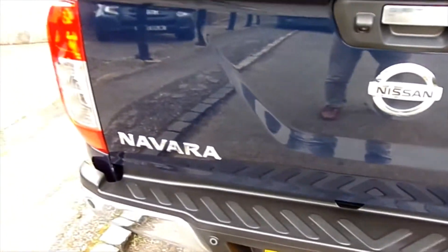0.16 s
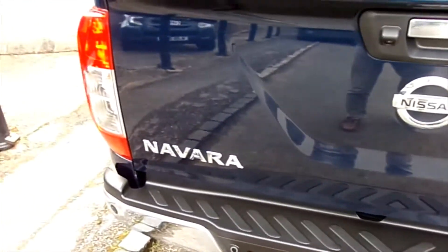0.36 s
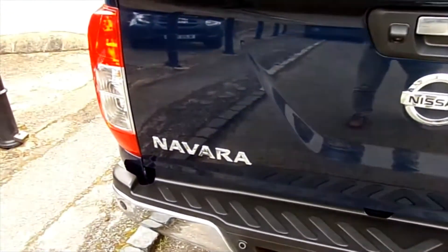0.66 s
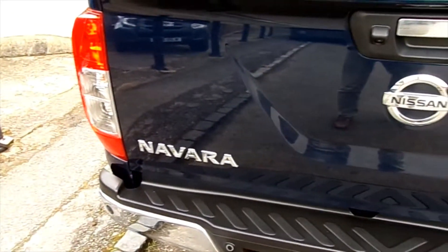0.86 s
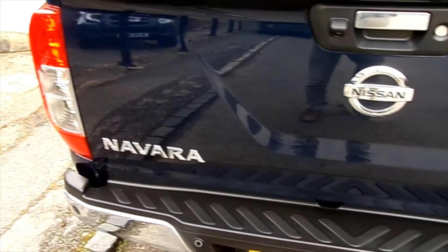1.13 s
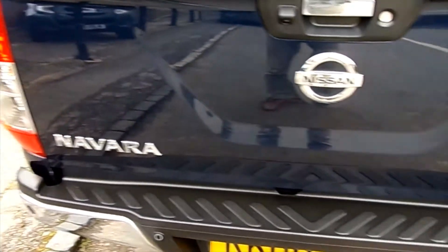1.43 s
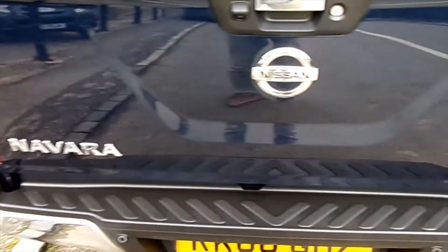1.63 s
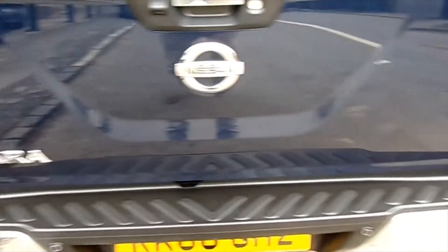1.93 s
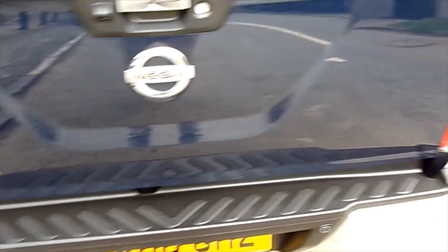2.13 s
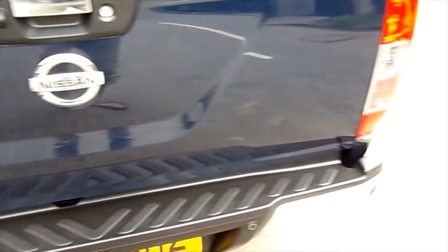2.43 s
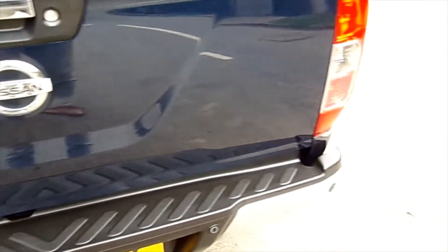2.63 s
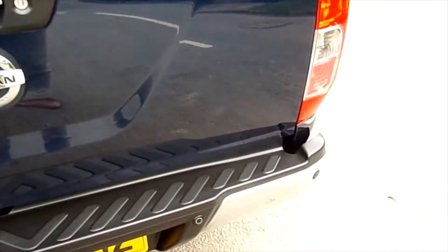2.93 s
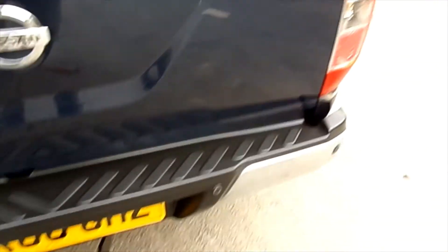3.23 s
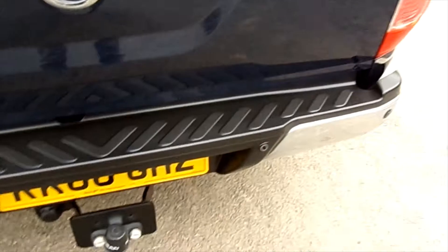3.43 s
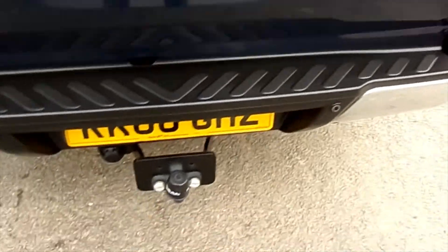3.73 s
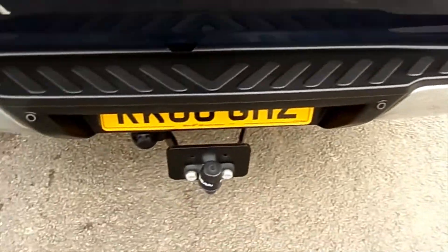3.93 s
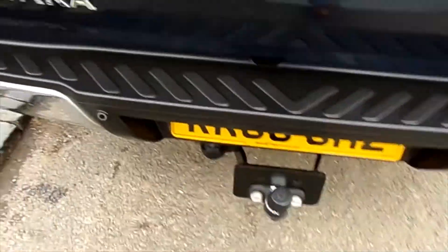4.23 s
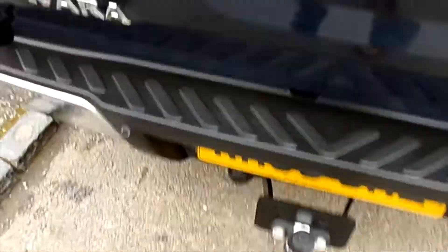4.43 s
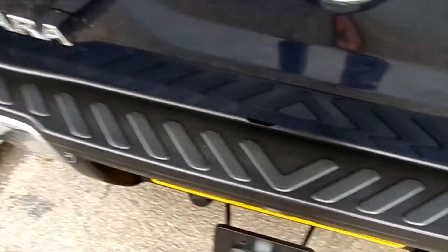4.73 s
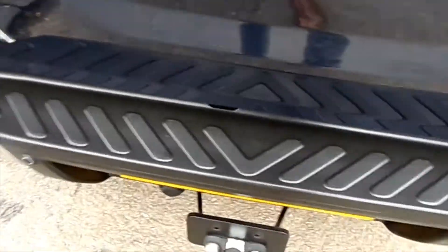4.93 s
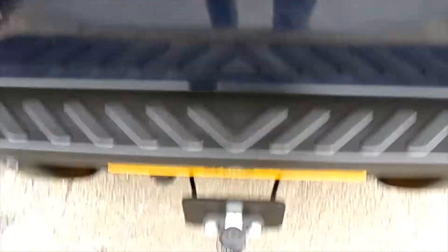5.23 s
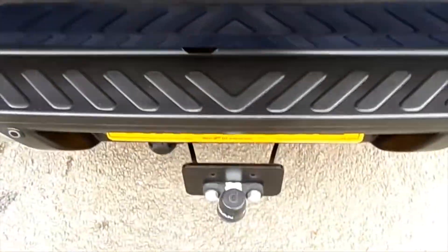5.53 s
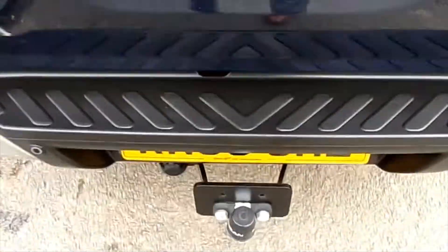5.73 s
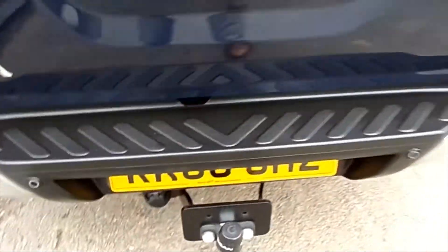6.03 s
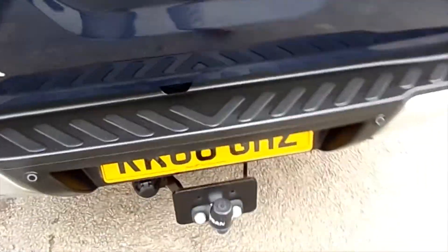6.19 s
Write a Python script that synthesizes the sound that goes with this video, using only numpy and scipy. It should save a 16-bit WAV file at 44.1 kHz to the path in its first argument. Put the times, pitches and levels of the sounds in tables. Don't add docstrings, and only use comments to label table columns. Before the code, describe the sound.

A quiet outdoor parking spot: faint distant traffic rises and sinks, a sparrow chirps roughly every second and a half, and shoes scuff grit with tiny dry ticks. Late on, a thin whistling bird joins. Then a pickup tailgate slams very near, latch metal clattering over a hollow panel thump, with a short rattle fading. The small hand-held microphone overloads and dulls the blow.

```python
import sys
import numpy as np
from scipy import signal
from scipy.fft import rfft, irfft
from scipy.io import wavfile
from scipy.ndimage import uniform_filter1d

SR = 44100
rng = np.random.default_rng(int(sys.argv[2]) if len(sys.argv) > 2 else 0)


def gain_from_db(level_db):
    decades = np.asarray(level_db, float) / 20
    return 10 ** decades


def persist_wave(psi):
    counts = np.round(np.clip(psi, -1, 1) * 32767).astype(np.int16)
    wavfile.write(sys.argv[1], SR, np.atleast_2d(counts).T)


N = 280476

# start_s, clatter_db, bright_edge_db, panel_push_db, clatter_length_s
SLAM_CONTACTS = [(5.8265, -30.5, -50, -26, 0.05), (5.8304, -15.5, -49, -29, 0.056),
                 (5.8356, -17.5, -36, -24, 0.04), (5.8405, -19.5, -31, -21, 0.034),
                 (5.8434, -34.5, -21, -27, 0.041), (5.8463, -35, -32, -29, 0.047),
                 (5.8514, -13.5, -29, -37.5, 0.035), (5.855, -34, -39, -37, 0.04),
                 (5.866, -30, -72, -30, 0.034), (5.8775, -33.5, -66, -32.5, 0.04),
                 (5.895, -19.5, -63, -43, 0.034), (5.906, -26.5, -60, -30, 0.026),
                 (5.916, -46, -66, -40, 0.035), (5.9285, -37.5, -74, -38, 0.035),
                 (5.943, -25.5, -68, -29.5, 0.029), (5.9607, -27.5, -68, -41, 0.04),
                 (5.965, -38, -79, -44, 0.04), (5.981, -43.5, -65, -48, 0.04),
                 (6.005, -30.5, -66, -44, 0.031), (6.032, -54, -72, -62, 0.05),
                 (6.0473, -34.5, -75, -49.5, 0.032), (6.067, -51, -71, -58, 0.044),
                 (6.0801, -48, -73, -59, 0.045), (6.099, -52.5, -77, -59, 0.04),
                 (6.1234, -51, -73, -55, 0.036), (6.1477, -50, -80, -47.5, 0.04),
                 (6.223, -43.5, -79, -62, 0.036), (6.263, -47.5, -80, -54.5, 0.03)]
# pitch_hz, level_db, time to fall 60 dB fall_s
PANEL_TONES = [(60.4, -17.5, .5), (108.3, -13.5, 0.55), (150, -13, 0.34), (185, -6, 0.26), (230, 1.5, 0.28),
               (282, -3, 0.29), (328.3, 6.5, 0.23), (592, -0.5, 0.19), (675, -5.5, 0.12), (770, 2.5, 0.17),
               (866, -10.5, 0.33), (1005, -7.5, 0.24), (1060, -10, 0.12)]
# pitch_hz, level_db, fall_s
LATCH_TONES = [(1410, -10, 0.11), (1844, -8, 0.055), (2290, -15, 0.083), (2378, -7, 0.085),
               (2479, -4.5, 0.13), (2946, -7.5, 0.07), (3179, -2.5, 0.058), (3836, 0.5, 0.063),
               (4170, -5, .1), (4900, -6, 0.046), (5140, -8, 0.055), (6480, -2.5, 0.056)]
# start_s, peak_db, ring_hz, thud_over_peak_db, length_s
SMALL_KNOCKS = [(0.595, -44, 4800, -25, 0.023), (0.6018, -42.5, 2760, -25, 0.02),
                (0.609, -45, 4900, -23, 0.017), (1.02, -63, 1980, -4, 0.02),
                (3.028, -37.5, 2080, -28, 0.014), (3.04, -41, 2960, -23, 0.014),
                (3.0654, -62, 2080, -9, 0.02), (3.082, -53, 2120, -1.5, 0.02), (3.11, -64, 1800, -5, 0.02),
                (3.6294, -58, 1870, 2, 0.02), (4.682, -54, 2660, -5, 0.02),
                (4.739, -47.5, 2350, -12, 0.017), (4.8786, -34, 2510, -13.5, 0.014),
                (4.881, -46, 2260, -6, 0.02), (4.9054, -42, 1860, -12, 0.02), (4.912, -54, 1840, 1, 0.02),
                (4.99, -56, 1930, -7, 0.02)]
# time_s, pitch_hz, level_db
SPARROW_ARCHES = [
    [(0.785, 3010, -66), (0.819, 4030, -50.5), (0.845, 4126, -49), (0.875, 3900, -51.5), (0.887, 4162, -64),
     (0.93, 3770, -71)],
    [(2.405, 3210, -63), (2.411, 3110, -63), (2.443, 4090, -50), (2.519, 3979, -64), (2.545, 3990, -71)],
    [(3.985, 2960, -65), (4.015, 3880, -53.5), (4.049, 4265, -47.5), (4.109, 3420, -69), (4.12, 3800, -76)],
    [(5.33, 3020, -62), (5.338, 2970, -66), (5.36, 4203, -54.5), (5.418, 3862, -55), (5.48, 3888, -73),
     (5.49, 3964, -70)],
    [(6.195, 3542, -63), (6.217, 4040, -54), (6.263, 3990, -57), (6.285, 3310, -61), (6.31, 3500, -70)],
]
# time_s, pitch_hz, level_db
SPARROW_LEADS = [
    [(0.755, 4960, -69), (0.765, 4883, -65), (0.779, 4925, -56), (0.82, 4870, -69)],
    [(2.375, 4900, -81), (2.387, 4780, -62), (2.407, 5220, -58), (2.43, 5410, -67)],
    [(3.95, 4700, -72), (3.96, 4720, -62), (3.968, 4940, -67), (4.01, 4970, -63)],
    [(5.31, 5427, -71), (5.324, 4861, -61), (5.35, 5300, -73), (5.36, 5427, -64)],
    [(6.07, 6000, -63), (6.102, 5483, -67), (6.114, 5440, -60), (6.148, 5480, -73), (6.17, 5579, -61)],
]
# time_s, pitch_hz, level_db
THIN_WHISTLES = [
    [(3.15, 5840, -91), (3.174, 6111, -97), (3.19, 7000, -84), (3.226, 6330, -83), (3.25, 6829, -88)],
    [(3.33, 6368, -97), (3.344, 6877, -87), (3.398, 6366, -90), (3.412, 5848, -82), (3.43, 6450, -88)],
    [(5.19, 7560, -93), (5.212, 6870, -82), (5.264, 6290, -78), (5.336, 6460, -76), (5.342, 5670, -73),
     (5.37, 6600, -81)],
    [(5.425, 6200, -97), (5.441, 6890, -72), (5.461, 6430, -75), (5.591, 6380, -75), (5.623, 6400, -92),
     (5.643, 6350, -81), (5.65, 6100, -81)],
    [(5.665, 5800, -63), (5.673, 6500, -94), (5.681, 7040, -74), (5.719, 6492, -74), (5.811, 6400, -78),
     (5.825, 5753, -68)],
]
# time_s, pitch_hz, level_db
FAR_CHEEPS = [
    [(0.415, 4112, -73), (0.425, 4239, -67), (0.437, 4211, -73), (0.445, 3930, -75)],
    [(1.52, 3290, -79), (1.534, 3479, -80), (1.554, 2916, -85), (1.58, 3477, -74)],
    [(1.82, 3275, -81), (1.83, 3111, -87), (1.856, 3564, -82), (1.88, 3253, -74)],
    [(2.04, 3340, -84), (2.052, 4269, -80), (2.076, 4158, -72), (2.1, 3978, -76)],
    [(3.355, 4468, -84), (3.359, 4470, -80), (3.367, 3910, -73), (3.39, 3796, -78)],
    [(5.64, 2991, -73), (5.66, 3014, -69), (5.668, 3087, -80), (5.69, 3066, -81)],
]
# time_s, rumble_db, tyre_roar_db, hiss_db
TRAFFIC_SWELLS = [(0.0, -66.5, -65.5, -66.5), (0.28, -69.5, -63, -68), (0.76, -66.5, -58, -62.5),
                  (0.97, -62.5, -55, -62), (1.11, -58.5, -55, -63.5), (1.31, -59, -55.5, -65),
                  (1.61, -56.5, -55.5, -65.5), (1.91, -60.5, -57, -64.5), (2.28, -62.5, -57, -63),
                  (2.58, -63.5, -61, -63.5), (2.71, -61.5, -60, -65), (3.4, -64.5, -62.5, -64.5),
                  (3.77, -62.5, -59, -63.5), (4.06, -64, -59, -63.5), (4.44, -64.5, -61, -66.5),
                  (4.92, -60, -60.5, -65.5), (5.42, -64.5, -61.5, -68), (5.76, -64.5, -59, -66.5),
                  (5.86, -57, -63, -69), (5.99, -48, -53.5, -59), (6.08, -56, -62, -64.5),
                  (6.18, -65, -59.5, -63.5), (6.36, -65.5, -57.5, -63.5)]
# frequency_hz, level_db (per Hz)
TRAFFIC_COLOUR = [(12, -75), (20, -44), (75, -15), (209, -3), (249, -1.5), (390, -14.5), (513, -12.5),
                  (765, -4), (889, -6.5), (1030, -5), (1330, -10), (3420, -21), (4500, -29), (6230, -30),
                  (7800, -50), (10100, -85), (17200, -120)]
# centre_hz, width_hz, depth (0 to 1)
HOUSING_DIPS = [(3750, 100, 0.57), (4325, 147, 0.6)]
TIME = np.arange(N) / SR


def level(x, db):
    return x * gain_from_db(db) / np.sqrt(np.mean(x ** 2))


def band(x, lo_hz, hi_hz, order=2):
    limits = [lo_hz, min(hi_hz, 0.45 * SR)]
    return signal.sosfilt(signal.butter(order, limits, "band", fs=SR, output="sos"), x)


def ring(x, hz, t60):
    shrink = np.exp(-np.log(1000) / (t60 * SR))
    turn = 2 * np.pi * hz / SR
    return signal.lfilter([0, np.sin(turn)], [1, -2 * shrink * np.cos(turn), shrink * shrink], x)


def walk(rate):
    hold = int(SR / rate)
    steps = np.repeat(rng.standard_normal(N // hold + 1), hold)
    return 1.3 * uniform_filter1d(uniform_filter1d(steps, hold), hold)[:N]


def burst(start_s, db, t60, rise=0.00066):
    since = np.maximum(TIME - start_s, 0)
    fade = np.exp(-np.log(1000) * since / max(t60, 0.002))
    return gain_from_db(db) * (1 - np.exp(-since / rise)) * fade


def echoes(x, t60, wet_db):
    t = TIME[:SR // 2]
    tail = rng.standard_normal(len(t)) * np.exp(-np.log(1000) * t / t60) * (t > 0.004)
    tail = tail / np.sqrt(np.sum(tail ** 2))
    return x + gain_from_db(wet_db) * signal.fftconvolve(x, tail)[:N]


def ring_all(x, tones):
    return sum(gain_from_db(db) * ring(x, hz, t60) for hz, db, t60 in tones)


def slam():
    start_s, clatter_db, edge_db, push_db, t60 = np.transpose(SLAM_CONTACTS)
    noise = rng.standard_normal((3, N))
    impacts = noise[0] * gain_from_db(2.87 * rng.exponential(size=N))
    spray = impacts * sum(map(burst, start_s, clatter_db, t60))
    metal = gain_from_db(-13.5) * band(spray, 1600, 5200) + gain_from_db(-39.5) * ring_all(spray, LATCH_TONES)
    edge = band(noise[1], 7500, 17000) * sum(map(burst, start_s, edge_db + 4, 0.21 * t60))
    push = noise[2] * sum(burst(s, db, 0.054, 0.0022) for s, db in zip(start_s, push_db))
    panel = gain_from_db(-35) * ring_all(push, PANEL_TONES) + gain_from_db(7) * band(push, 30, 1500)
    return echoes(metal, 0.3, -17) + edge + echoes(panel, 0.37, -17.5)


def ticks():
    grit = band(rng.standard_normal(N), 980, 5160)
    low = level(band(rng.standard_normal(N), 34, 385), 0)
    out = 0
    for start_s, peak_db, ring_hz, thud_db, t60 in SMALL_KNOCKS:
        crack = grit * burst(start_s, peak_db, t60)
        short_ring = 2.4 * band(crack, ring_hz * 0.64, ring_hz * 1.21, order=1)
        thud = low * burst(start_s, peak_db + thud_db - 1, 0.11, 0.0043)
        out = out + crack + short_ring + thud
    return echoes(out, 0.071, -10.5)


def sing(calls, rough, wobble, rate):
    size = np.maximum(1 + rough * walk(rate), 0)
    shake = 1 + wobble * walk(rate)
    out = 0
    for call in calls:
        time_s, pitch_hz, level_db = np.transpose(call)
        sounding = (TIME > time_s[0]) & (TIME < time_s[-1])
        gate = uniform_filter1d(sounding * 1.0, 300)
        pitch = np.interp(TIME, time_s, pitch_hz) * shake
        phase = 2 * np.pi * np.cumsum(pitch) / SR
        tone = np.sin(phase) + gain_from_db(-49.5) * np.sin(2 * phase)
        loudness = gain_from_db(np.interp(TIME, time_s, level_db)) * size
        out = out + gate * loudness * np.sqrt(2) * tone
    return out


def birds():
    sparrow = sing(SPARROW_ARCHES, 0.47, 0.0306, rate=350) + sing(SPARROW_LEADS, 0.36, 0.049, rate=270)
    thin = sing(THIN_WHISTLES, 0.3, 0.0087, rate=120) + sing(FAR_CHEEPS, 0.3, 0.0077, rate=200)
    return echoes(gain_from_db(1) * sparrow, 0.29, -1.3) + echoes(gain_from_db(5.5) * thin, 0.3, -2)


def traffic():
    time_s, *swells = np.transpose(TRAFFIC_SWELLS)
    colour_hz, colour_db = np.transpose(TRAFFIC_COLOUR)
    f = np.arange(N // 2 + 1) * SR / N + 1
    colour = gain_from_db(np.interp(np.log(f), np.log(colour_hz), colour_db))
    spectrum = rfft(rng.standard_normal(N)) * colour
    out = 0
    for swell_db, lo_hz, hi_hz in zip(swells, (0, 450, 1500), (450, 1500, SR)):
        region = 0
        for edge_hz in 20 * 2 ** np.arange(0, 9, 0.5):
            pick = (f >= max(edge_hz, lo_hz)) & (f < min(edge_hz * 2 ** 0.5, hi_hz))
            if pick.any():
                flicker = gain_from_db(1.03 * walk(5))
                region = region + irfft(spectrum * pick, N) * flicker
        out = out + level(region, 0) * gain_from_db(np.interp(TIME, time_s, swell_db))
    return out


def scene():
    return (slam() + ticks() + birds() + traffic())[None]


def low_pass(x):
    return signal.sosfilt(signal.butter(12, 16050, fs=SR, output="sos"), x)


def record(dry):
    x = 0.16 * np.tanh(dry / 0.16)
    for centre_hz, width_hz, depth in HOUSING_DIPS:
        x = x - min(depth, 1) * band(x, centre_hz - width_hz / 2, centre_hz + width_hz / 2, order=1)
    hiss = level(band(rng.standard_normal(N), 8800, 13100), -99)
    top_hiss = level(band(rng.standard_normal(N), 13000, 15800, order=4), -97)
    return low_pass(x + hiss + top_hiss)


dry = scene()
out = record(dry)
persist_wave(out)
```